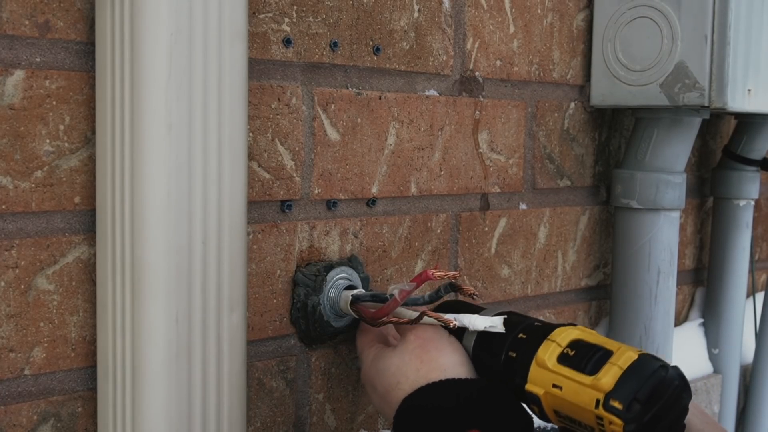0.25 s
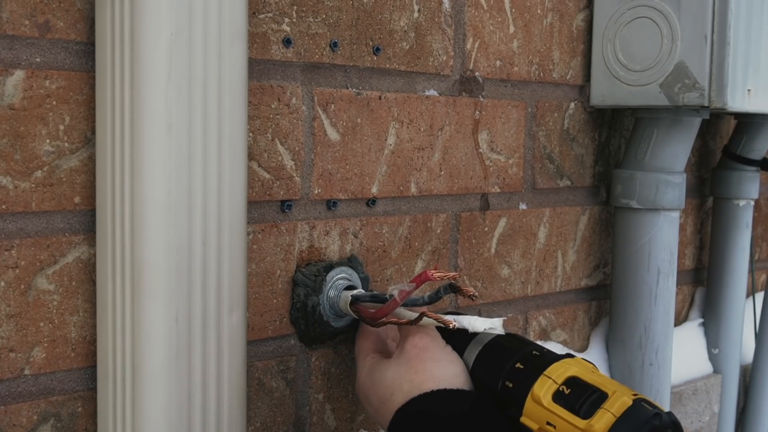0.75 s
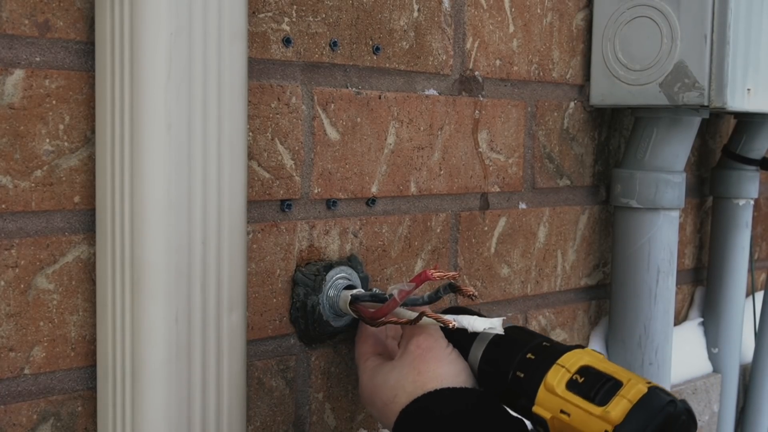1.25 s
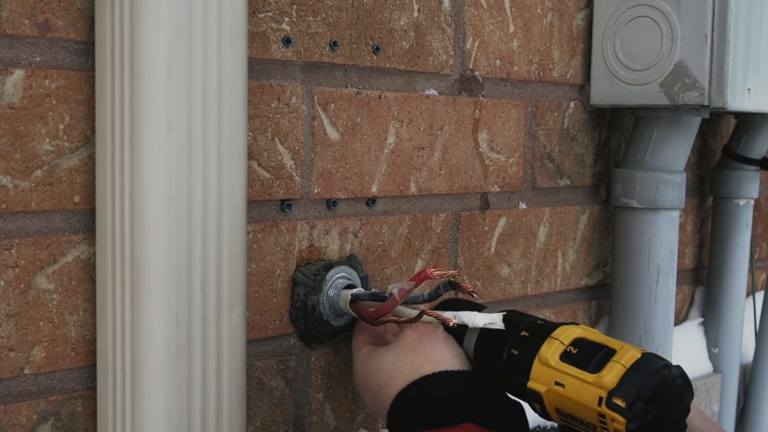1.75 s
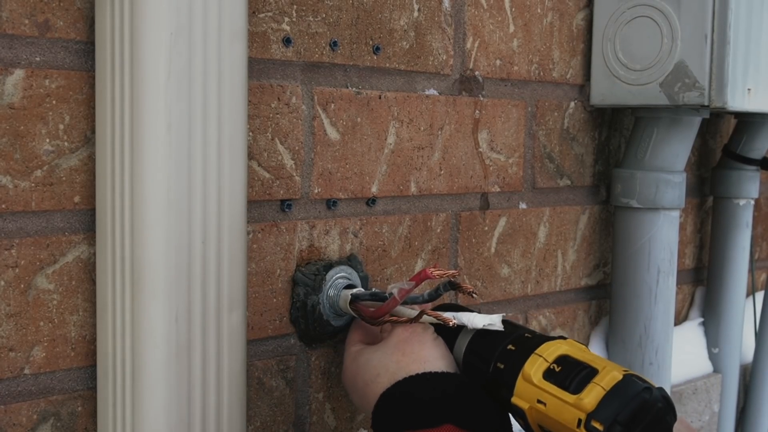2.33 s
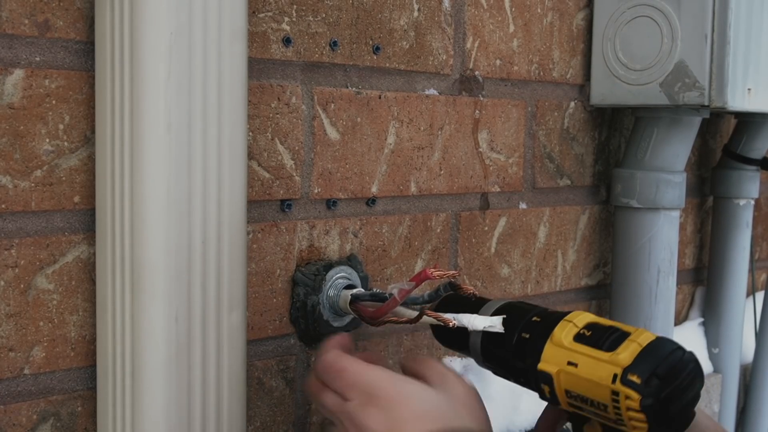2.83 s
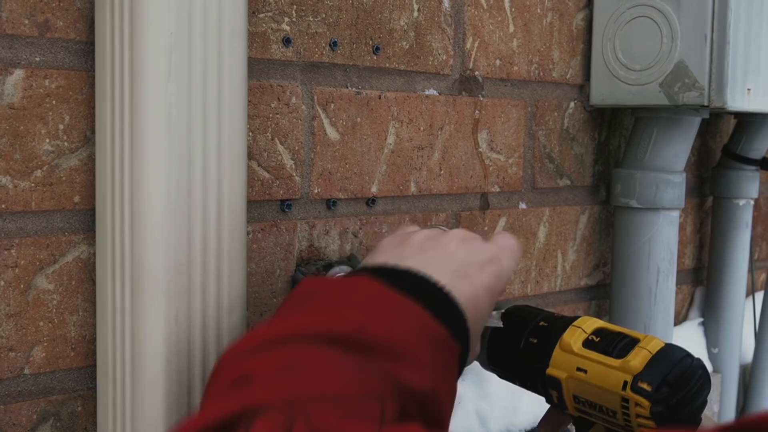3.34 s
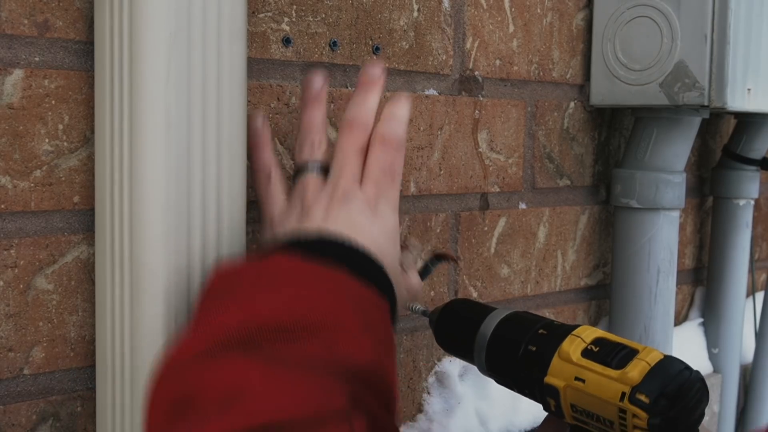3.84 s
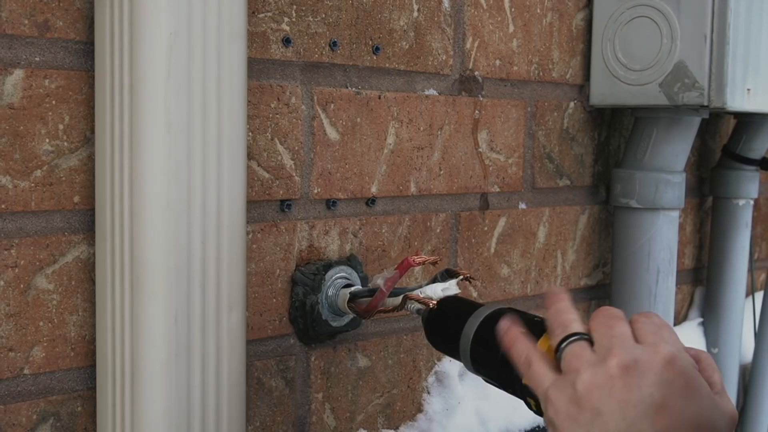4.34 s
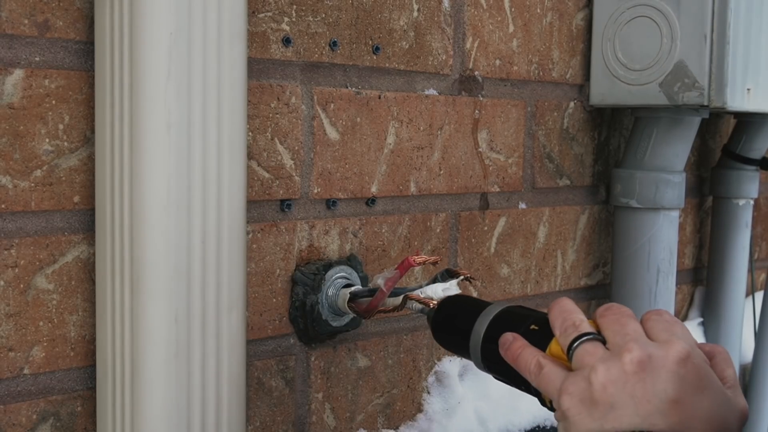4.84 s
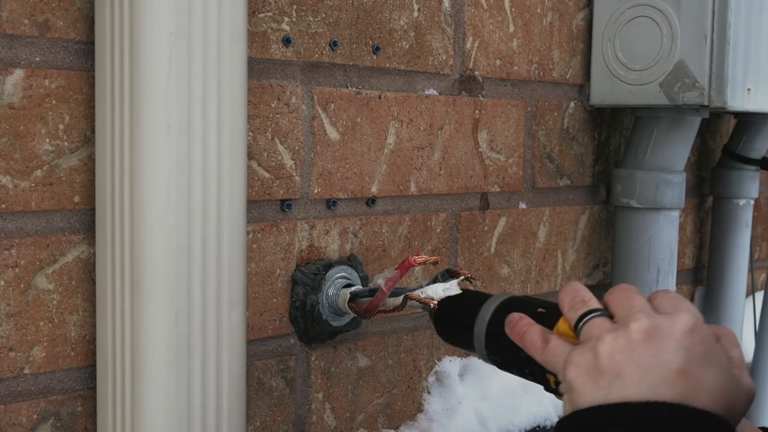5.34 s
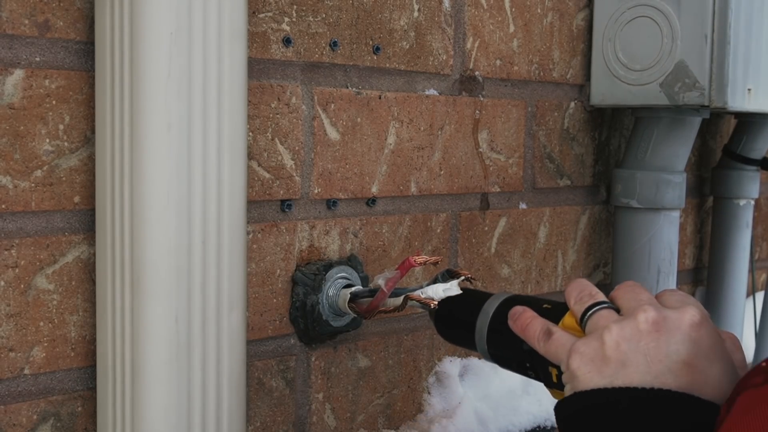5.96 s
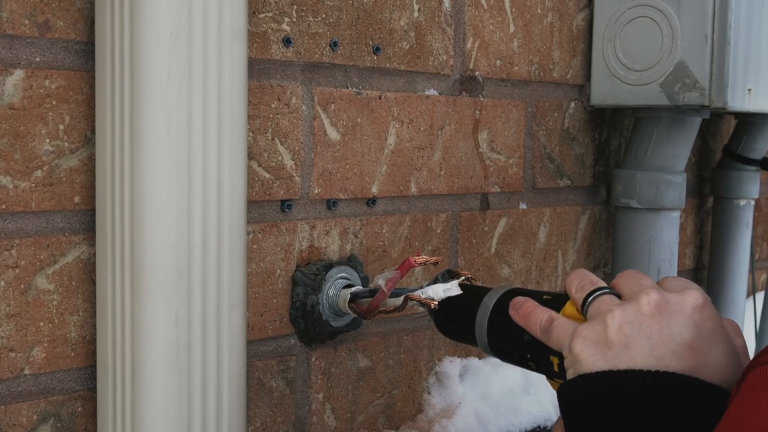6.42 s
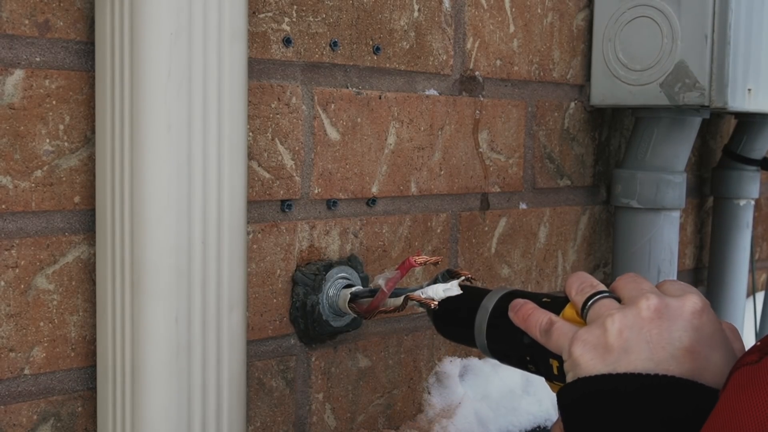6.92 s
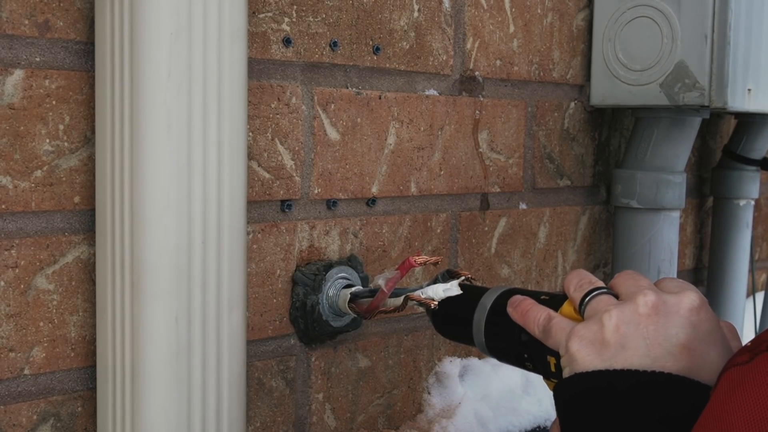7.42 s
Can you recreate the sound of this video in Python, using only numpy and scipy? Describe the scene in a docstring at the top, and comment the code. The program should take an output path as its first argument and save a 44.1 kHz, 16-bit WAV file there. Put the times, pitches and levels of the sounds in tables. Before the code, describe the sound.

Close outdoors, a drill bit stutters into brick, thudding grittily at first, then, after hollow bumps and plastic clicks, speeding into a harsh sustained buzz.

```python
"""A cordless hammer drill bores into an outdoor brick wall, close to the microphone.
Its speed control whines as the bit creeps and knocks; then the ratchet hammers, one thud and burst of grit
per tooth, slowly in the first run; in the second it speeds up into a loud buzz of fused blows and chatter.
Between the runs a hand brushes the wires, bumps the downspout and grips the drill with plastic clicks.
Behind it lie a rustling sleeve, low wind, a distant hum and a faint scatter from walls and ground."""
import sys
import numpy as np
from scipy import signal
from scipy.io import wavfile
from scipy.ndimage import uniform_filter1d, map_coordinates

SR = 44100
rng = np.random.default_rng(int(sys.argv[2]) if len(sys.argv) > 2 else 0)


def wav_out(sig):
    """Save sig, one row per channel (or a flat mono array), as 16-bit PCM at SR to the path in sys.argv[1]."""
    wavfile.write(sys.argv[1], SR, np.round(np.clip(np.atleast_2d(sig).T, -1, 1) * 32767).astype(np.int16))


N = 339129
T = np.arange(N) / SR
HZ = np.fft.rfftfreq(4096, 1 / SR)


def amp(db):
    """Decibels to gain."""
    return 10 ** (np.asarray(db) / 20)


def unit(x):
    """Scales to an rms of one."""
    return x / np.sqrt(np.mean(x ** 2) + 1e-20)


def peaked(x):
    """Scales to a peak of one."""
    return x / abs(x).max()


def curve(rows):
    """Points joined by straight lines in time."""
    return np.interp(T, *np.transpose(rows))


def held(start, stop, attack_s=0.00067, release_s=0.0012):
    """Rises from the start, holds, and has fallen to nothing at the stop."""
    return np.clip((T - start) / attack_s, 0, 1) * np.clip((stop - T) / release_s, 0, 1)


def swells(rows):
    """Bell-shaped rises and falls of level."""
    return sum(amp(db) * np.exp(-((T - middle) / spread) ** 2) for middle, spread, db in rows)


def colour(points, resonances=()):
    """A spectrum in dB with resonances laid on it."""
    hz, db = np.transpose(points)
    base_db = np.interp(np.log(HZ + 1), np.log(hz), db)
    return base_db + sum(gain / (1 + (2 * (HZ - f) / width) ** 2) for f, width, gain in resonances)


def shaped(x, db):
    """Causal (minimum-phase) filter of unit energy with the given spectrum."""
    log_gain = np.log(amp(np.r_[db, db[-2:0:-1]]))
    minimum_phase = np.exp(np.conj(signal.hilbert(log_gain)))
    ring = np.fft.ifft(minimum_phase).real[:len(db)]
    return signal.oaconvolve(x, ring / np.linalg.norm(ring))[:len(x)]


def noise(count=N):
    """White noise."""
    return rng.standard_normal(count)


def drift(hz):
    """Slow chance of rms about one, up to the given rate."""
    knots = noise(N // 20)
    return np.interp(T * hz * 2, np.arange(len(knots)), knots) * np.sqrt(3 / 2)


def patchy(x, depth_db=1.5):
    """Brick crumbles unevenly: the colour changes from moment to moment."""
    z = signal.stft(x, nperseg=512)[2]
    patches = uniform_filter1d(rng.standard_normal(z.shape), size=9, axis=0)
    patches = unit(uniform_filter1d(patches, size=3, axis=1))
    return unit(signal.istft(z * amp(depth_db * patches), nperseg=512)[1][:len(x)])


def add(mix, s, sound):
    """Lays a sound into the mix at a time."""
    part = mix[max(round(s * SR), 0):][:len(sound)]
    part += sound[:len(part)]


def ringing(modes, t):
    """Decaying modes after one blow."""
    return sum(amp(db) * np.sin(2 * np.pi * hz * t) * np.exp(-np.log(1000) * t / t60)
               for hz, db, t60 in modes)


# at full speed the bit rattles loosely until it seats in its hole
SEATED_AT_S, SEATING_S = 5.33, .04


def looseness():
    """One while the bit wanders, zero once it has seated."""
    return .5 - .5 * np.tanh((T - SEATED_AT_S) / (2 * SEATING_S))


def fused(rate):
    """Zero while the blows are separate, one when they run together."""
    return np.clip((rate - 220) / 190, 0, 1)


# ratchet teeth, one blow each in a turn of the chuck
TEETH = 16
# hammer speed in the first run: t/s, blow rate f/Hz
FIRST_SPEED = [(1.683, 47.4), (2.02, 46.7), (2.11, 60.8), (2.25, 64), (2.33, 67.9), (2.38, 110),
               (2.45, 126.5), (2.72, 129), (2.81, 104), (2.86, 45)]
# hammer speed in the second run: t/s, blow rate f/Hz
SECOND_SPEED = [(4.586, 79.2), (4.61, 128.9), (4.665, 144.8), (4.78, 92.75), (4.85, 85), (4.9, 147.6),
                (5.03, 240.2), (5.12, 417.6), (5.14, 436), (5.18, 448.8), (5.28, 413.3), (5.3, 431.4),
                (5.38, 461.8), (6.12, 438.1), (6.77, 439.7), (7.14, 427.4), (7.5, 430.3), (7.69, 423.4)]
# colour of drill and wall at low speed: f/Hz, relative level/dB
SLOW = [(60, -12.5), (125, 0.5), (250, -3), (450, -2), (850, -1.5), (1200, -3), (2600, -7.5), (3600, -11.5),
        (6000, -16), (8800, -13.5), (10400, -25.5), (12500, -16.5), (15800, -27.5)]
# resonances of the drill, bit and wall: f/Hz, width/Hz, level/dB
BODY = [(345, 49, 8.5), (556.4, 51, 11), (687, 63, 9), (803, 90, -5), (1457, 446, 9.5), (1777, 260, -5),
        (2060, 390, 3.5), (3054, 180, 4), (4265, 1500, 9), (7740, 940, 5.5), (9600, 290, 2.5)]
# blows hit harder as the speed rises, up to FULL_FORCE_HZ blows a second
FULL_FORCE_HZ, THUD_DB_PER_OCTAVE, CRACK_DB_PER_OCTAVE = 122, 2, 3.5


def hammer(speed, envelope, thud_db, crack_db, bite_db, dust_db, between_db,
           split_hz=900, burst_s=0.001, uneven_db=-0.86, rebound=0.64):
    """Each ratchet tooth drives the bit into the brick: a low thud and a burst of crushed grit."""
    rate = curve(speed)
    turns = np.cumsum(rate * (T >= speed[0][0])) / SR  # counted in teeth
    count = np.ceil(turns).astype(int)
    teeth = noise(TEETH)[count % TEETH]  # no two teeth strike alike
    blows = np.diff(count, prepend=0) * amp(uneven_db * (teeth + noise()) / np.sqrt(2))
    low_db = -10 * np.log10(1 + (HZ / split_hz) ** 6)
    high_db = -10 * np.log10(1 + 14 / (1 + (HZ / 520) ** 6))

    thud_body = BODY + [(136, 49, 4.8), (238, 96, 3.3)]
    thud = shaped(np.sqrt(blows * SR / rate), colour(SLOW, thud_body) + low_db)
    # the thud rebounds along the bit, which spreads it in time without colouring it
    gap = np.zeros(round(0.00307 * SR))
    thud = signal.lfilter(np.r_[-rebound, gap, 1], np.r_[1, gap, -rebound], thud)

    # the grit swells as the tooth drops, then dies within a few milliseconds
    burst = np.exp(-abs(np.arange(-400, 401) / SR) / burst_s)
    power = abs(signal.oaconvolve(blows ** 2 * SR / rate, burst / burst.sum(), "same"))
    grit = patchy(noise()) * np.sqrt(power)
    # between blows a steady grinding is left, a touch brighter in the treble
    grit = grit + amp(between_db) * shaped(noise(), colour([(1500, -7.0), (7000, -5.5)]))
    crack_body = BODY + [(2270, 410, bite_db), (13000, 1900, dust_db)]
    crack = shaped(grit, colour(SLOW, crack_body) + high_db)

    octaves = np.log2(np.minimum(rate / FULL_FORCE_HZ, 1))
    separate = 1 - fused(rate)
    thud = amp(thud_db + THUD_DB_PER_OCTAVE * octaves) * separate * thud
    crack = amp(crack_db + CRACK_DB_PER_OCTAVE * octaves) * np.sqrt(separate) * crack
    return envelope * (thud + crack)


# colour of drill and wall at full speed: f/Hz, relative level/dB
FAST = [(60, -49), (125, -32), (250, -7.5), (450, -22), (850, -3), (1200, 0.5), (2600, 1.5), (3600, -3),
        (6000, -4.5), (8800, 0), (10400, -11), (12500, -2.5), (15800, -12.5)]


def run_up(clang_db=-23.5, from_hz=130, clear_hz=220, slip=0.039, top_hz=2300, ring_db=4):
    """As the blows quicken, the loose bit clangs alike on each one: a stack of overtones sweeps upward."""
    rate = curve(SECOND_SPEED)
    turns = np.cumsum(rate) / SR + slip * drift(50)
    stack = unit(sum(np.cos(2 * np.pi * (k * turns + rng.random())) for k in range(1, 20)))
    dull_db = -10 * np.log10(1 + (HZ / top_hz) ** 4)
    level = np.clip((rate - from_hz) / (clear_hz - from_hz), 0, 1) * looseness()
    return amp(clang_db) * level * shaped(stack, colour(FAST, BODY + [(2220, 630, ring_db)]) + dull_db)


# the fused blows form a chord; each partial swells as the speed carries it through a resonance:
# multiple of the hammer speed, level/dB on the resonance once seated, resonance f/Hz, width/Hz
CHORD = [(1, -18.5, 454.5, 47.6), (2, -18.5, 878, 340), (3, -17.5, 1380, 570), (4, -14.5, 1712, 116),
         (5, -20, 2135, 115), (5, -22, 2290, 170), (7, -25, 3068, 165)]
# gear tones and the rattle of uneven blows:
# multiple of the hammer speed, level/dB before the gear load, added roughness
UPPER = [(1 + 1 / TEETH, -32, .05), (2.45, -33, .9), (3.53, -26, .99), (10, -30.5, .44),
         (12.33, -31.5, .06)]
# higher partials flutter more: extra roughness per multiple, and at the seventh
ROUGH_GROWTH, TOP_ROUGH = .22, .1
LOOSE_ROUGH, SEATED_ROUGH, LOOSE_TONE_DB = 0.68, 0.037, -5.5  # loose adds to seated roughness
# the gears sing louder as the load drags the speed below its free-running value
FREE_HZ, GEAR_DB_PER_SAG_HZ, UNLOADED_GEAR_DB = 454, 0.2546, -7.5


def buzz(throb=0.071, wobble=0.25, slip=0.022, waver_db=0.63):
    """The fused blows at full speed; the turning chuck sways every partial, and higher ones are rougher."""
    rate, loose = curve(SECOND_SPEED), looseness()
    turns = np.cumsum(rate) / SR
    chuck = 2 * np.pi * turns / TEETH
    turns = turns + slip * drift(25)
    rattle = SEATED_ROUGH + LOOSE_ROUGH * loose

    partials = []
    for k, db, hz, width in CHORD:
        off_db = -20 * np.log10(1 + (2 * (k * rate - hz) / width) ** 2)
        rough = rattle * (1 + ROUGH_GROWTH * k) + TOP_ROUGH * (k / 7) ** 3
        partials.append((k, db + off_db + LOOSE_TONE_DB * loose, rough))
    sag_hz = np.maximum(FREE_HZ - rate, 0)
    load_db = UNLOADED_GEAR_DB + GEAR_DB_PER_SAG_HZ * sag_hz * (1 - loose)
    for k, db, rough in UPPER:
        # the purer the tone, the more it follows the load
        partials.append((k, db + load_db * (1 - min(rough, 1)), rattle + rough))

    out = np.zeros(N)
    for k, db, rough in partials:
        start, swell, sway = rng.uniform(0, 2 * np.pi, 3)
        flutter = (1 + rough * (drift(55) + 1j * drift(55))) / np.sqrt(1 + 2 * rough ** 2)
        phase = 2 * np.pi * k * turns + start + wobble * np.sin(chuck + sway)
        level = amp(db + waver_db * np.sqrt(k) * drift(3))
        level = level * (1 + throb * (1 + 1 / k) * np.sin(chuck + swell))
        out += level * (flutter * np.exp(1j * phase)).real
    return np.sqrt(2) * out * fused(rate)


# the bit sinks into the wall, which damps its chatter and its ring: f/Hz, width/Hz, level/dB
SINKING_S, SUNK_DB, BIT_RING = 1.5, -1.66, (2380, 272, 3.7)


def chatter(chatter_db=-14.5, repeat_share=0.58, slip=0.016, pulsing=0.26, throb_db=1.13, flicker_db=0.16):
    """At full speed the bit chatters in the hole; part of the pattern comes round with each chuck turn."""
    rate = curve(SECOND_SPEED)
    turns = np.cumsum(rate) / SR
    one_turn = noise(1600)
    place = (turns + slip * drift(60)) / TEETH % 1 * len(one_turn)
    repeating = unit(map_coordinates(one_turn, [place], order=3, mode="grid-wrap"))
    grit = np.sqrt(repeat_share) * repeating + np.sqrt(1 - repeat_share) * patchy(noise())
    pulse = np.exp(pulsing * np.cos(2 * np.pi * turns))
    sway_db = throb_db * np.sin(2 * np.pi * turns / TEETH) + flicker_db * drift(90)
    grit = unit(grit * pulse * amp(sway_db)) * np.sqrt(fused(rate))
    # the free length of the bit rings, and is damped as it sinks into the wall
    sunk = np.clip((T - SEATED_AT_S) / SINKING_S, 0, 1)
    free_ring = shaped(grit, colour(FAST, BODY + [BIT_RING]))
    damped = shaped(grit, colour(FAST, BODY))
    return amp(chatter_db + SUNK_DB * sunk) * ((1 - sunk) * free_ring + sunk * damped)


# whine of the speed control: start t/s, stop t/s, fade/s, level/dB, overtone level/dB relative
WHINE = [(0, .465, .004, -39, -3), (1.531, 1.9, .25, -36, -3), (4.491, 5.099, 0.12, -25.5, -13)]
WHINE_HZ = 3947  # centre of a slight drift


def whine(third_db=-20):
    """The switched motor current sings while the trigger is only partly pulled."""
    out, phase = np.zeros(N), 2 * np.pi * np.cumsum(WHINE_HZ + 6 * drift(5)) / SR
    for start, stop, fade_s, db, overtone_db in WHINE:
        overtones = np.sin(2 * phase) + amp(third_db) * np.sin(3 * phase)
        tone = np.sin(phase) + amp(overtone_db) * overtones
        out += np.sqrt(2) * amp(db) * tone * held(start, stop, release_s=fade_s)
    return out * amp(0.64 * drift(43))


# the bit grinding slowly without the hammer:
# start t/s, stop t/s, level/dB at the start, level/dB at the stop, before the unevenness
GRIND = [(0, .55, -31, -46.5), (1.533, 1.71, -47, -25.5), (4.52, 4.62, -21.5, -31.5)]


def grind(uneven_db=2.8):
    """The creeping bit grinds on the brick, as unevenly swelling noise through the drill's body."""
    level = np.zeros(N)
    for start, stop, first_db, last_db in GRIND:
        level += amp(curve([(start, first_db), (stop, last_db)])) * held(start, stop, release_s=0.034)
    grit = patchy(noise()) * level * amp(uneven_db * drift(70) + 2 * drift(400))
    tilt_db = colour([(300, 7.0), (600, -3), (1500, 0.0), (2800, 3.0)])
    return shaped(grit, colour(SLOW, BODY) + tilt_db)


# single knocks of the bit on the brick:
# t/s, peak level/dB before the knock trim, treble level/dB against the middle
KNOCKS = [(.021, -5.5, 0.5), (.052, -11.5, 2), (.124, -15, -5), (0.15, -18, 6), (.205, -15.5, -3),
          (.259, -14, -11), (.307, -13.5, 0), (0.357, -13.5, 0), (.971, -22.5, -10), (1.422, -7.5, -6.5),
          (1.602, -5.5, 2.5), (1.646, -3.5, 1), (1.681, -3.5, -1), (2.832, -6.5, 4), (3.422, -41, 6),
          (3.647, -32, 7), (3.725, -29, -6), (3.736, -17.5, -6), (4.526, -2, -1), (4.565, -0.5, -1)]


def knocks(trim_db=-1.0, knock_s=0.0015, tail_db=-19, tail_s=0.012, bass_db=-7):
    """The bit knocks against the brick: noise with a quick fall and a weaker, longer tail."""
    out, t = np.zeros(N), T[:4000]
    fall = (1 - np.exp(-t / 0.0006)) * (np.exp(-t / knock_s) + amp(tail_db) * np.exp(-t / tail_s))
    for s, db, treble_db in KNOCKS:
        tilt_db = colour([(300, bass_db), (1200, 0.16), (2400, 0.49), (7000, treble_db)])
        knock = shaped(patchy(noise(len(t))) * fall, colour(SLOW, BODY) + tilt_db)
        add(out, s, amp(db + trim_db) * peaked(knock))
    return out


# low jolts of the drill as it stalls: t/s, level/dB
JOLTS = [(0, -21.5), (1.431, -35), (2.835, -19.5)]
# the modes of the housing they ring: f/Hz, relative level/dB, t60/s
HOUSING = [(114.6, -8.5, 0.3), (171, -5, 0.23), (209, -5.5, 0.37), (363, -8, 0.19), (388, -1.5, 0.09)]


def jolts():
    """The stalling drill jolts, and its housing rings in low decaying modes."""
    out, t = np.zeros(N), T[:SR // 2]
    for s, db in JOLTS:
        add(out, s, amp(db) * ringing(HOUSING, t) * (1 - np.exp(-t / 0.002)))
    return out


# light squeaky scrapes as the drill shifts: t/s, length/s, level/dB
SQUEAKS = [(.105, 0.0082, -31), (.144, 0.0093, -23), (.19, .02, -29.5), (.575, .04, -38),
           (.824, 0.042, -49.5), (1.017, .06, -54.5), (1.135, .024, -47.5), (1.26, .032, -51),
           (1.358, .032, -48.5), (1.428, 0.013, -39)]
# the rings of the squeaks: f/Hz, width/Hz, level/dB
SQUEAK_RINGS = [(2840, 900, 10.3), (8380, 940, 25)]
# the hand brushing the wires: t/s, length/s, level/dB
WIRE_TOUCHES = [(3.108, 0.0077, -38.5), (3.147, 0.025, -39.5)]
# the rings of the wires: f/Hz, width/Hz, level/dB
WIRE_RINGS = [(4030, 500, 20), (7830, 1200, 24)]
# colour of both kinds of scrape: f/Hz, relative level/dB
SCRAPE_COLOUR = [(300, -2), (1400, 6), (3500, 1.5), (6000, -13), (11500, -16), (14200, -6), (16000, -14)]


def scrapes(rows, rings, uneven_db=4):
    """Short stuttering scrapes with a thin ring."""
    out, stutter = np.zeros(N), noise() * amp(uneven_db * drift(140))
    for s, length, db in rows:
        stroke = unit(stutter[round(s * SR):][:round(length * SR)])
        with_room = np.r_[stroke, 0 * stroke]  # silence for the ring to die in
        add(out, s, amp(db) * shaped(with_room, colour(SCRAPE_COLOUR, rings)))
    return out


# hollow bumps on the downspout: t/s, peak level/dB of the modes
BUMPS = [(4.018, -3.5), (4.048, -15.5)]
# modes of the downspout: f/Hz, relative level/dB, t60/s
SPOUT = [(255, -23.5, 0.16), (517, -2, 0.024), (581, 3, 0.036), (644, -21, 0.3), (810, -24.5, 0.26),
         (940, -17.5, 0.11), (1135, 4, 0.015), (2270, -10, 0.016)]


def downspout(rattle_db=-13, rattle_s=0.014):
    """The hand bumps the hollow downspout, which rings in its modes over a short rattle."""
    out, t = np.zeros(N), T[:12000]
    for s, db in BUMPS:
        rattle = shaped(noise(len(t)) * np.exp(-t / rattle_s), colour(SLOW, BODY))
        hollow = peaked(ringing(SPOUT, t) * (1 - np.exp(-t / 0.0023)))
        add(out, s, amp(db) * (hollow + amp(rattle_db) * rattle))
    return out


# plastic clicks as the hand takes hold:
# t/s, peak level/dB of the modes, relative snap level/dB before the snap lift
CLICKS = [(4.2636, -10, 6), (4.271, -17, -9), (4.3586, -18.5, -21), (4.363, -20.5, -25)]
# modes of the drill's shell: f/Hz, relative level/dB, t60/s
SHELL = [(1390, -1, 0.011), (1465, 2, 0.017)]
# colour of the snap: f/Hz, relative level/dB
SNAP = [(300, -31), (1200, -3), (2200, -10), (2800, 7.5), (3500, -2), (4500, -12.5), (6400, -14),
        (7800, -9), (10000, -32), (16000, -30)]


def grip(snap_s=0.0022, snap_lift_db=3.5):
    """The hand takes hold of the drill: the plastic shell rings briefly under a noisy snap."""
    out, t = np.zeros(N), T[:12000]
    for s, db, snap_db in CLICKS:
        snap = peaked(shaped(noise(len(t)) * np.exp(-t / snap_s), colour(SNAP)))
        shell = peaked(ringing(SHELL, t) * (1 - np.exp(-t / 0.00077)))
        add(out, s, amp(db) * (shell + amp(snap_db + snap_lift_db) * snap))
    return out


# swishes of the jacket sleeve, and a light fall of dust at 2.87 s: middle t/s, spread/s, level/dB before the
# flutter
SWISHES = [(2.87, .06, -48), (3.35, 0.4, -56), (3.735, 0.015, -40), (3.875, 0.025, -44.5),
           (4.27, 0.16, -48)]
# colour of the cloth: f/Hz, relative level/dB
CLOTH = [(200, 6), (1500, 6.5), (3500, 1), (6000, -4.5), (8200, -2), (10300, -13), (13000, -11),
         (16000, -9)]


def sleeve():
    """The jacket sleeve rustles and a little dust falls: fluttering noise in bell-shaped swells."""
    return swells(SWISHES) * amp(2.9 * drift(68)) * shaped(noise(), colour(CLOTH))


def yard(x, low_t60=1.0, high_t60=0.19):
    """A faint scatter from walls and ground, lasting longest in the bass."""
    hz, t, z = signal.stft(noise(SR // 2), SR, nperseg=256)
    t60 = np.interp(hz, [200, 2500], [low_t60, high_t60])[:, None]
    decay = np.exp(-np.log(1000) * t / t60) * (t > .005)
    tail = signal.istft(z * decay, SR, nperseg=256)[1]
    return signal.oaconvolve(x, tail / np.linalg.norm(tail))[:N]


# gusts on the microphone: middle t/s, spread/s, level/dB
GUSTS = [(1.0, 0.47, -37), (4.85, 0.11, -40)]


def wind(breeze_db=-46):
    """Low wind on the microphone: a steady breeze of deep noise, swelling in gusts."""
    rumble = shaped(noise(), colour([(12, 1.0), (25, 1), (60, -24.5), (200, -33), (1000, -95)]))
    return (amp(breeze_db) + swells(GUSTS)) * rumble


# colour of the outdoor air: f/Hz, relative level/dB
AIR = [(40, -17), (200, -1), (300, -6), (900, -5.5), (1500, -12), (2500, -21.5), (4000, -29.5),
       (8000, -34.5), (16000, -43)]


def neighbourhood(air_db=-49):
    """Distant hum of the neighbourhood: dull noise with a slightly drifting level."""
    return amp(air_db + 0.4 * drift(4.8)) * shaped(noise(), colour(AIR))


def scene(yard_db=-29):
    """Everything is heard from the middle."""
    first = hammer(FIRST_SPEED, held(1.658, 2.855, attack_s=.08, release_s=0.051),
                   thud_db=-20.0, crack_db=-12.5, bite_db=5.5, dust_db=-0.5, between_db=-7.5)
    second = hammer(SECOND_SPEED, held(4.57, T[-1], attack_s=0.011),
                    thud_db=-19, crack_db=-12.5, bite_db=-4.5, dust_db=-0.5, between_db=-7)
    drill = first + second + run_up() + buzz() + chatter() + whine() + grind() + knocks() + jolts()
    squeaks = scrapes(SQUEAKS, SQUEAK_RINGS)
    hand = scrapes(WIRE_TOUCHES, WIRE_RINGS) + downspout() + grip()
    near = drill + squeaks + hand
    background = sleeve() + wind() + neighbourhood()
    return np.tile(near + amp(yard_db) * yard(near) + background, (2, 1))


def record(dry, drive_db=-0.17, ceiling=0.72, edge_hz=16100):
    """The microphone's loudest peaks are rounded off; then the band limit."""
    x = dry * amp(drive_db)
    x = x / (1 + (x / ceiling) ** 6) ** (1 / 6)
    low_pass = signal.firwin(511, edge_hz, window=("kaiser", 9), fs=SR)
    return signal.oaconvolve(x, low_pass[None], "same", axes=1)


dry = scene()
out = record(dry)
wav_out(out)
```